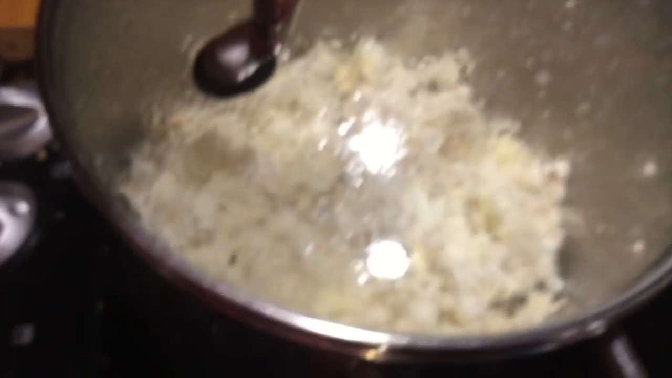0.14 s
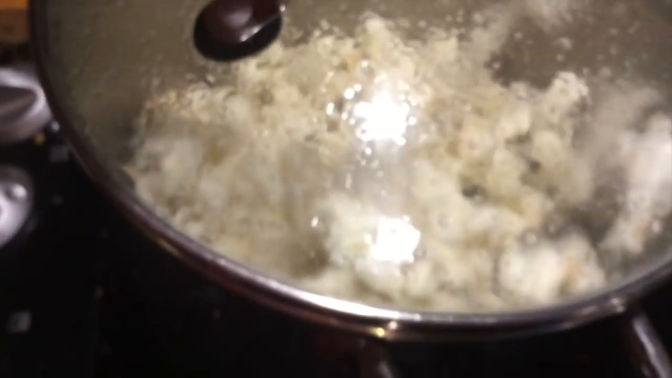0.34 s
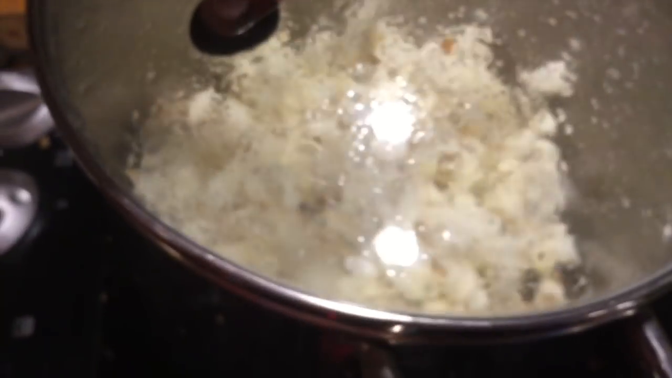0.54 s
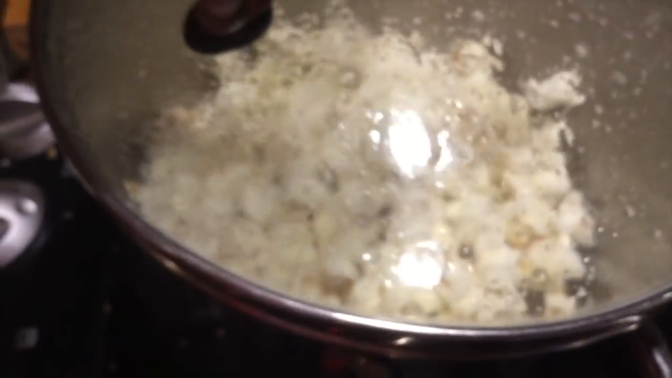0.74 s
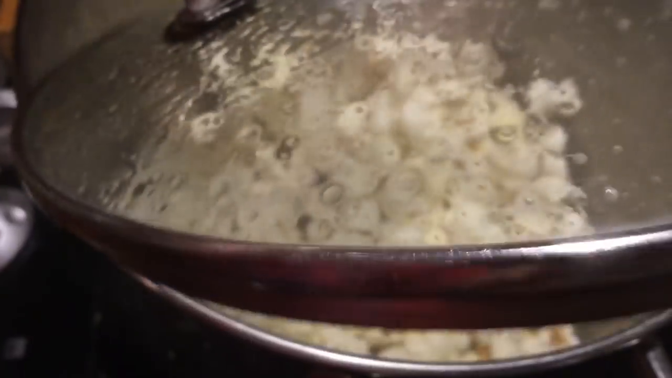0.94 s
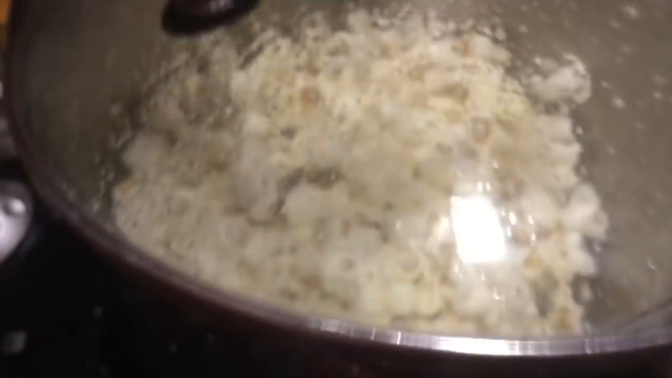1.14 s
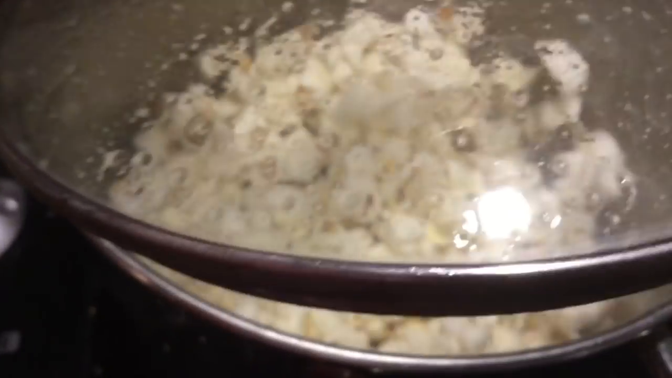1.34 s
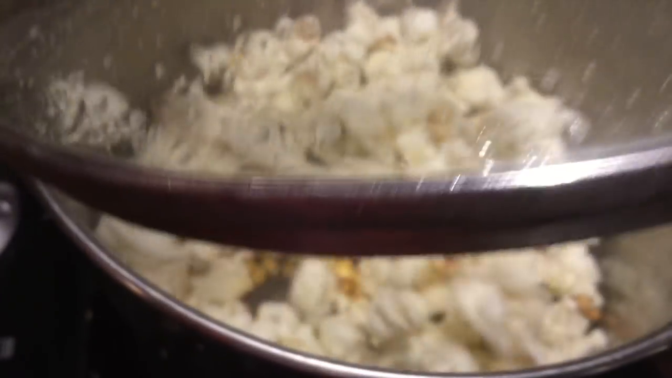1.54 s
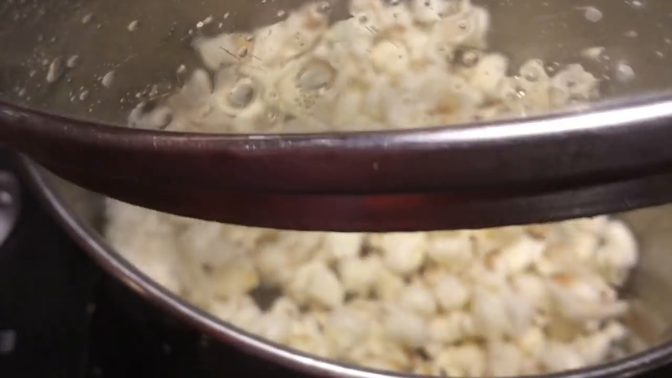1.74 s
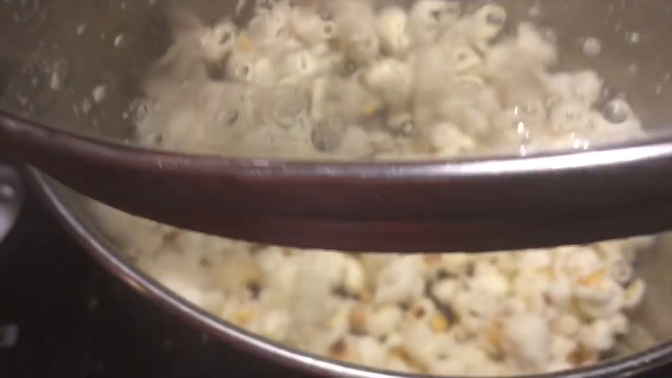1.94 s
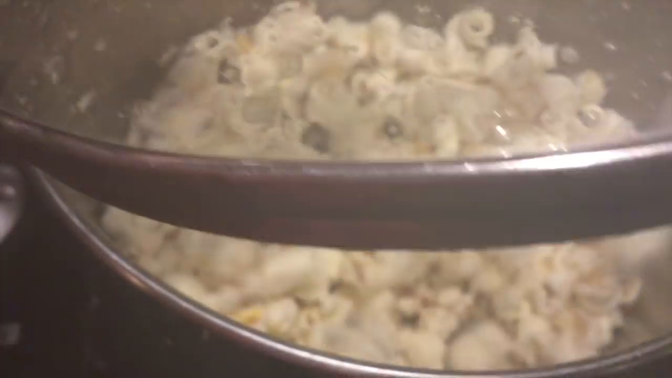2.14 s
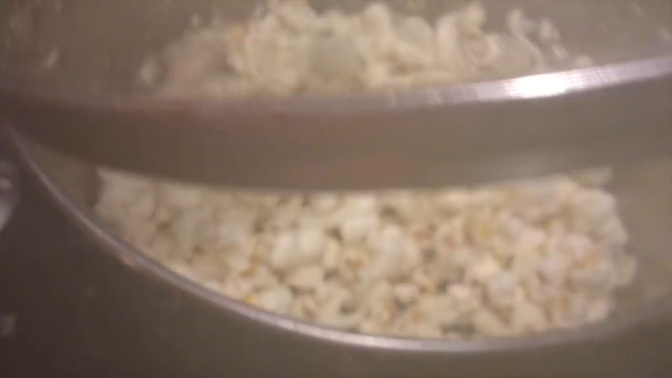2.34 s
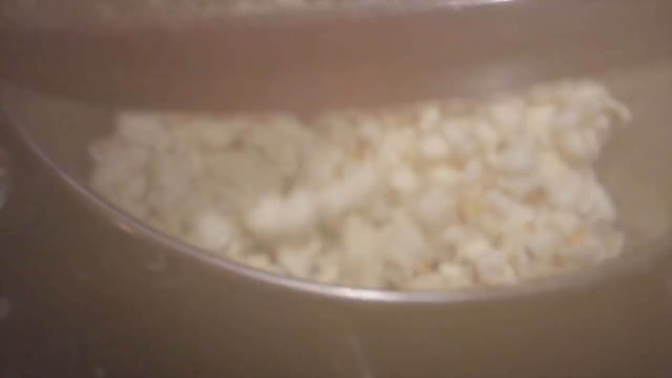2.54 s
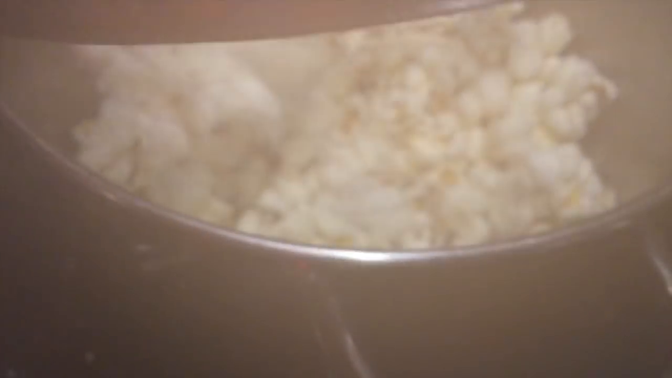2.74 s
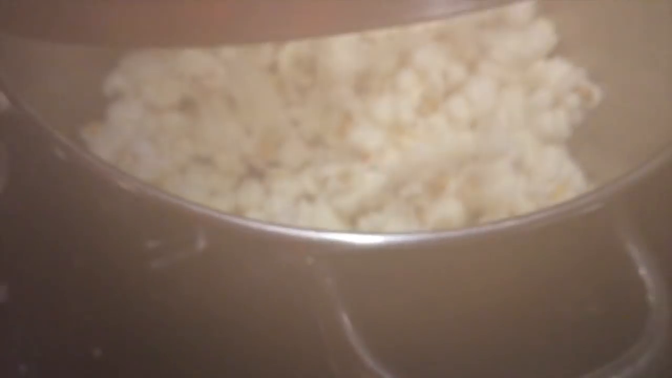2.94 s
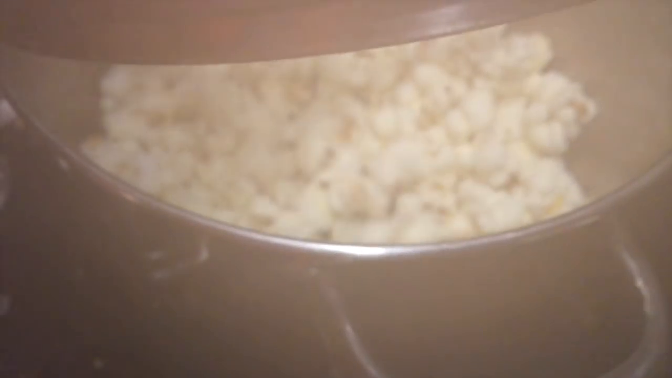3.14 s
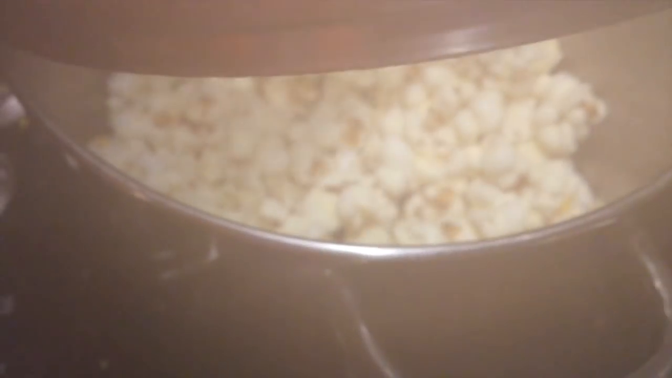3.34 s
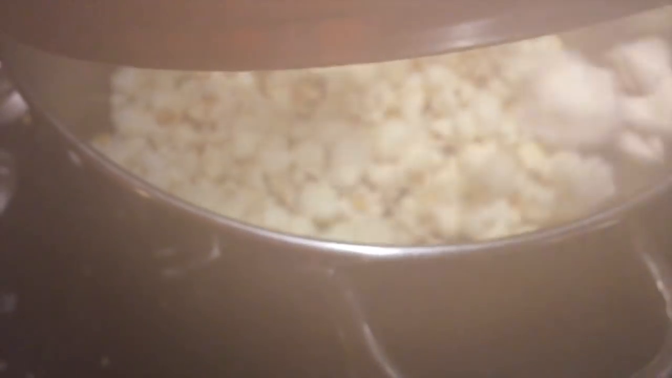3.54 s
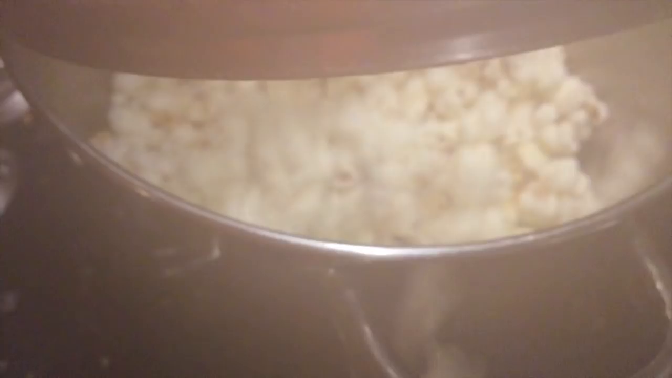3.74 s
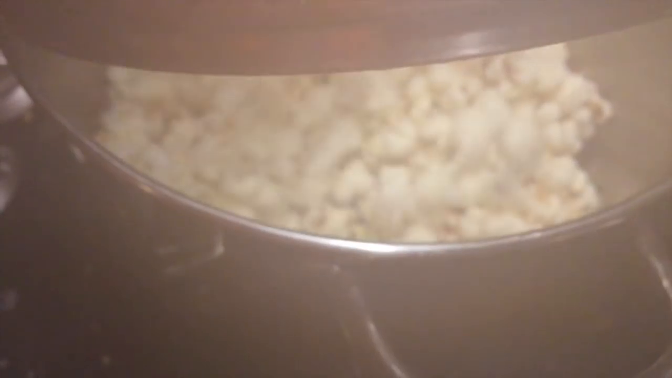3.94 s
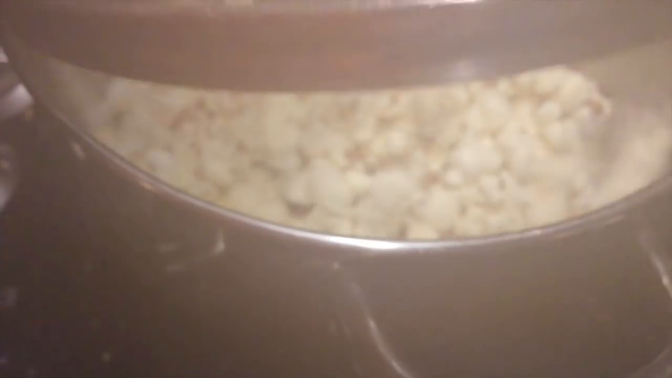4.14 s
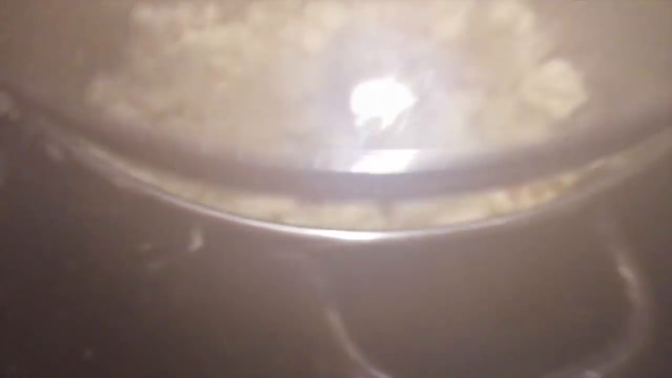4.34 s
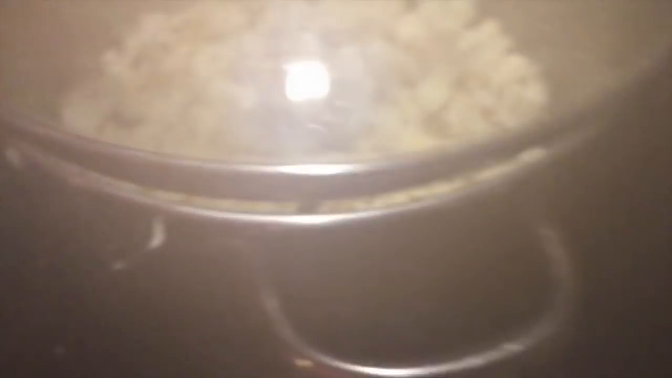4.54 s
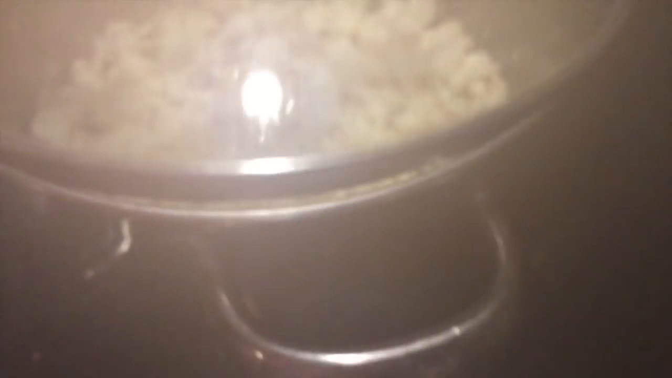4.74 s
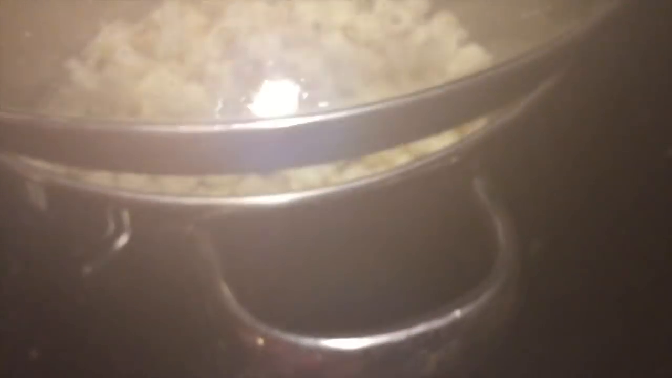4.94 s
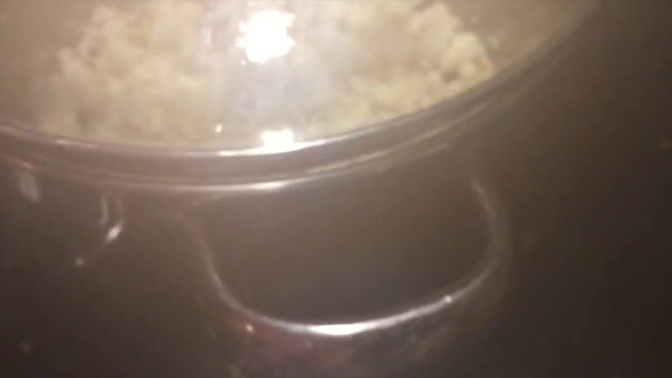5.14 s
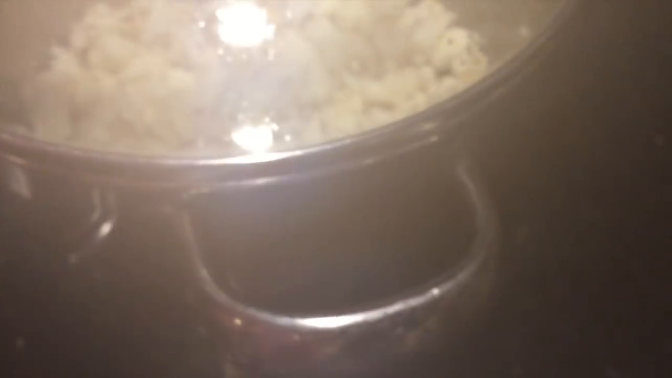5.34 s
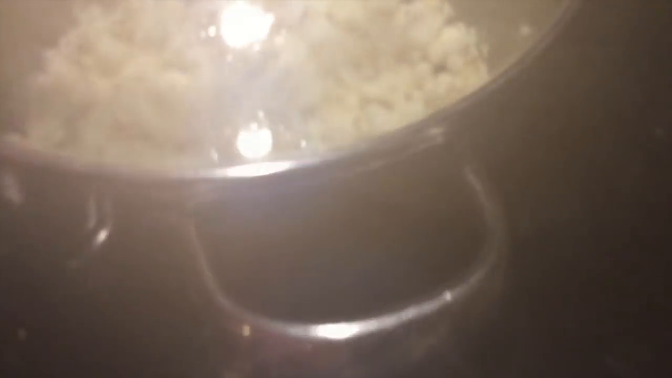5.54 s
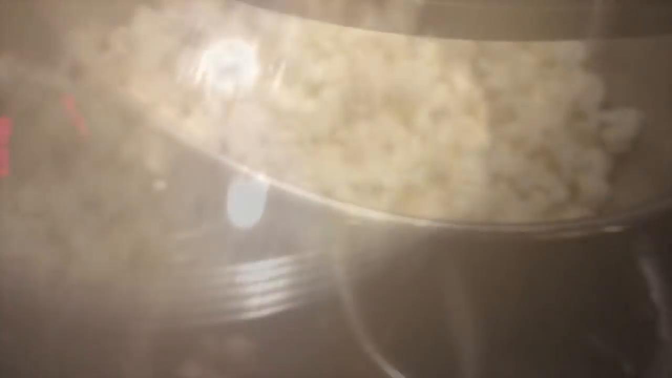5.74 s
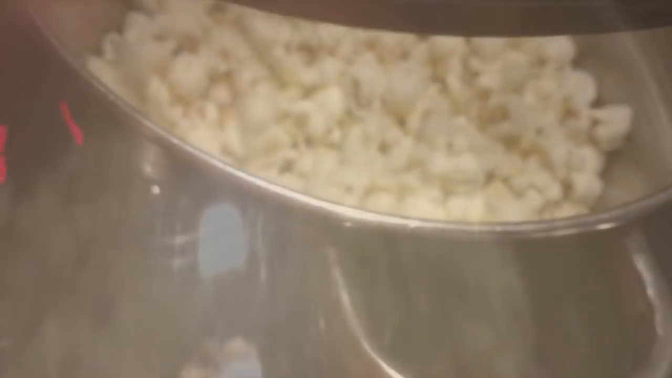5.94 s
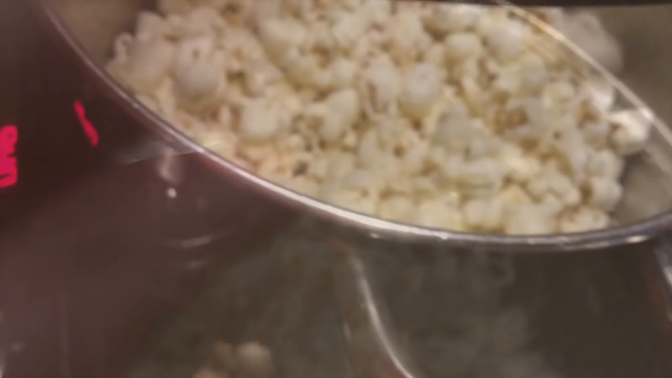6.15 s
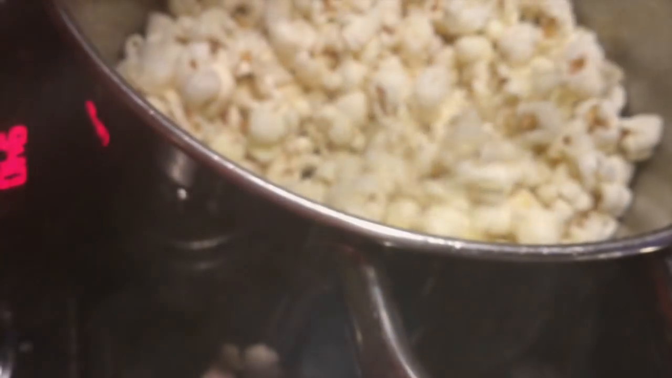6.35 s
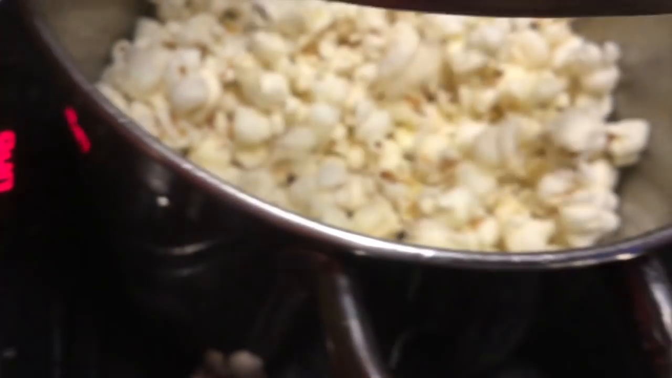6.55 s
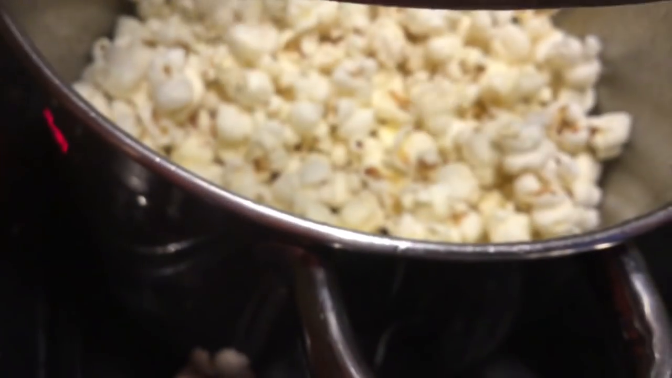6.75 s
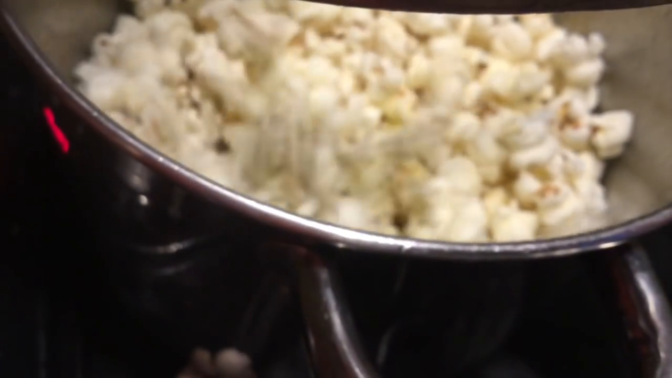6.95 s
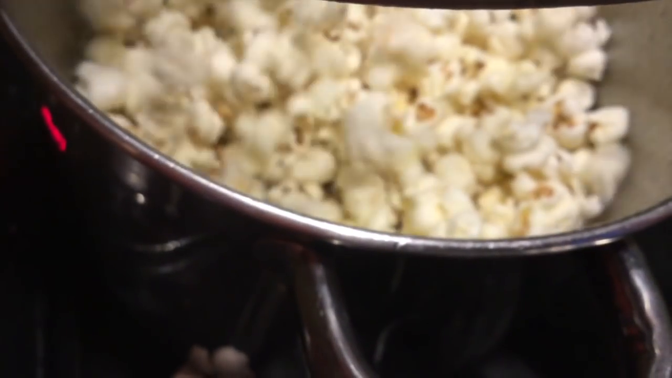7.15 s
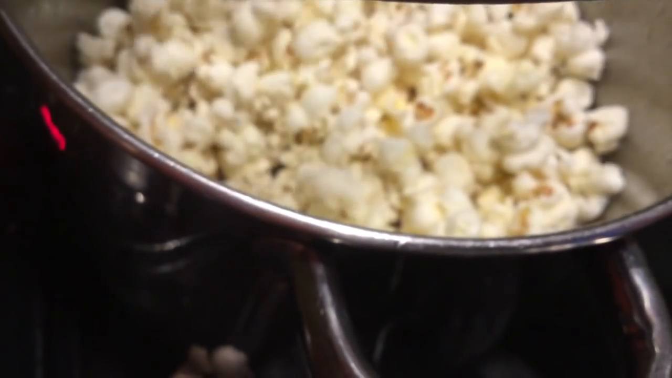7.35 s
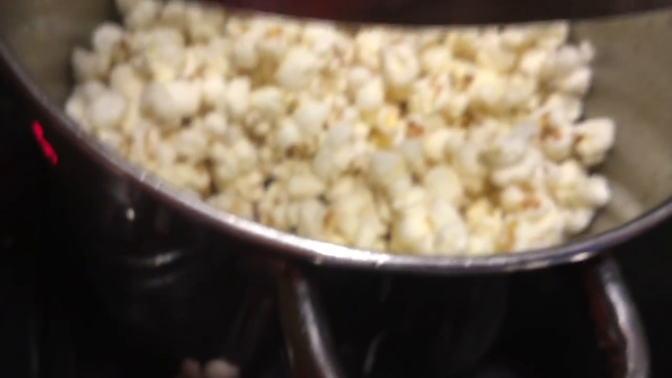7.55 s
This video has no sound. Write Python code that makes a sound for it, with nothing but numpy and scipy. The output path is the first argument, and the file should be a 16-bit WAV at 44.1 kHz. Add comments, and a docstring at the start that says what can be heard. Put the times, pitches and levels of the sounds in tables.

```python
"""Popcorn under a moving glass lid

Popcorn bursts in a steel pot on a hob, close to a phone, while a hand tilts, lifts and lowers the glass lid.
Bursts, landings, sharp lid knocks and small ticks are all made alike: a crack and a puff of noise that kick
the air in the pot and ring its wall. Between these hits oil sizzles in fine grains, the heap shuffles, and
the lid knocks dully and scrapes on the rim. The wider the lid's gap, the higher the air in the pot resounds.
A small kitchen and a soft hiss lie behind."""
import sys
import numpy as np
from scipy import signal
from scipy.fft import rfft, irfft, next_fast_len
from scipy.io import wavfile
from scipy.ndimage import uniform_filter1d, map_coordinates

SR = 44100
rng = np.random.default_rng(int(sys.argv[2]) if len(sys.argv) > 2 else 0)


def store_wav(level_fs):
    """Save 16-bit WAV to argv[1]."""
    pcm = np.round(np.clip(np.atleast_2d(level_fs), -1, 1) * 32767)
    wavfile.write(sys.argv[1], SR, pcm.T.astype(np.int16))


N = 334278

# kitchen and microphone noise floor: (frequency [Hz], density [dB per Hz])
HISS_COLOUR = [(18, -23), (40, 7), (106, -21), (145, -1), (230, -14), (380, 6), (520, -55), (750, -18),
               (1170, -14), (1430, -16), (1670, -15), (2500, -31), (7000, -14.5), (13300, -18),
               (16000, -45)]
# how long the room rings: (frequency [Hz], t60 [s])
KITCHEN_DECAY = [(100, 0.15), (500, 0.12), (1500, 0.16), (4000, 0.084), (12000, 0.076)]
# between hits: (time [s], shuffle on the base [dB], hum of the air [dB], rattle in the wall [dB], sizzle [dB])
BED_LEVELS = [(0.0, -52, -70, -55.5, -62), (0.49, -62, -80, -58.5, -62.5), (0.91, -55.5, -50.5, -55, -58),
              (1.52, -62, -61, -58, -67.5), (1.77, -65, -52, -49, -51), (2.53, -73, -68.5, -60.5, -49.5),
              (2.77, -59, -46, -59, -48), (3.04, -61, -61.5, -56.5, -51.5), (3.25, -79, -92, -64, -58),
              (3.5, -78, -77, -68, -66), (3.93, -63, -52.5, -58.5, -59), (4.28, -67, -57, -49.5, -42),
              (4.54, -64, -62.5, -59.5, -63), (5.07, -58, -48.5, -59.5, -63),
              (5.32, -40.5, -58, -64.5, -73), (5.53, -51.5, -72, -74, -73), (5.79, -58, -73, -57, -55),
              (6.04, -47, -73, -59, -69), (6.23, -63, -81.5, -71.5, -72), (6.93, -76, -89.5, -74.5, -75.5),
              (7.07, -65, -58, -64, -73), (7.58, -78, -78, -57, -47)]
# colour of the spitting oil: (frequency [Hz], density [dB per Hz])
SIZZLE_COLOUR = [(2000, -46), (4500, -13.5), (7000, -6.5), (11500, -5), (13700, -3.5), (15000, -29),
                 (16500, -45)]
# the air rises as the lid opens: (time [s], pitch of the air [Hz], pitch of the lowest wall ring [Hz])
LID_GAP = [(0, 228.5, 1284), (.8, 228.6, 1307), (.9, 254.3, 1290), (.96, 352, 1250), (1.03, 330, 1250),
           (1.15, 351.9, 1252), (4.2, 351.6, 1239), (4.4, 335, 1258), (4.5, 317, 1252), (4.6, 287.9, 1262),
           (5.15, 301, 1276), (5.3, 251.4, 1280), (5.75, 250, 1222), (5.9, 347, 1266), (6.4, 354.7, 1198),
           (7.58, 354.5, 1160)]
# the loaded base on the hob: (centre [Hz], width [Hz], level [dB])
BASE_MODES = [(153, 37, -3.5), (74, 81, -11.5)]
# where the loaded base rocks, higher while the hand leans on the lid: (time [s], pitch [Hz])
BASE_ROCK = [(0, 112), (.65, 115), (.85, 142), (1.1, 118), (4.5, 114.4), (5.3, 157), (6.3, 135),
             (6.9, 99.85), (7.58, 119.4)]
# steel wall and lid: (centre [Hz], width [Hz], level [dB])
WALL_MODES = [(1247, 22.5, -5.5), (1840, 82, -0.5), (2078, 18, -9.5), (2753, 123, -5), (3220, 175, -12.5),
              (3935, 224, 0), (4628, 108, -9), (4856, 32, -1), (5850, 48, -9)]
# the glass lid while it sits on the pot: (centre [Hz], width [Hz], level [dB])
GLASS_MODES = [(1753, 18, -0.5), (2404, 28, 5), (3020, 45, -15), (3620, 17, 0), (5200, 76, -21),
               (5250, 110, -8), (5710, 43, -3)]
# the lid's rim drags on the pot:
# (start [s], length [s], level [dB], first resonance [Hz], last resonance [Hz], width [Hz])
RIM_DRAGS = [(.875, 0.16, -48.5, 556, 835, 90.5), (.89, 0.163, -55.5, 480, 693, 110),
             (1.275, 0.067, -50.5, 807, 800, 250), (1.394, 0.07, -54.5, 740, 685, 250),
             (5.02, 0.064, -54.5, 880, 880, 200), (5.167, 0.11, -54.5, 588, 594, 399.7),
             (5.344, 0.056, -39, 700, 607, 401), (5.479, 0.051, -58.5, 621, 566, 400),
             (5.91, 0.066, -52, 675, 637, 401), (5.97, .1, -55, 670, 645, 397),
             (6.12, .14, -59, 650, 740, 400)]
# dull jolts from the lid and the heap:
# (time [s], level [dB], base over that [dB], air over that [dB], base pitch [Hz], t60 [s])
DULL_KNOCKS = [(0.382, -31.5, 1.5, -1.5, 164, 0.081), (0.745, -44.5, 8, -4, 135, 0.084),
               (0.86, -36, 3, -4, 164, 0.07), (0.884, -18, -2, 0, 235, 0.068),
               (0.954, -39.5, -8, 3, 164, 0.08), (1.199, -30, -3, -0.5, 233, 0.11),
               (1.299, -37.5, -3, 0, 191, 0.13), (1.41, -38, -7, 2, 235, 0.11),
               (1.84, -34, 5, -1, 213, 0.07), (1.906, -31, 8.5, -6, 151.5, 0.034),
               (2.787, -46, 0, -6, 218, 0.062), (3.204, -41.5, -4, -1, 140, 0.07),
               (4.508, -36, 7, -1, 234, 0.07), (4.659, -52, -11, -11, 235, 0.072),
               (4.751, -28.5, 2.5, -0.5, 211, 0.059), (4.913, -39, -6, 1, 232, 0.07),
               (5.035, -41, -12, 2, 161, 0.091), (5.209, -36, 2, -1, 190, 0.074),
               (5.508, -33, 5.5, -3, 132, 0.084), (5.873, -43, 10, -10, 139, 0.07),
               (5.917, -25.5, 7.5, 2, 148, 0.082), (5.988, -36, 5, -3, 156, 0.054),
               (6.031, -47, 0, -4, 143, 0.053), (6.109, -35, 9, -5.5, 145, 0.05),
               (6.205, -46.5, 8, -6, 140, 0.047), (7.032, -38.5, -12.5, 4, 234, 0.078),
               (7.064, -47, -8, 5, 132, 0.077), (7.451, -34, 1, 3, 234, 0.059)]
# bursts, landings, sharp lid knocks and small ticks: (peak time [s], low puff [dB], high puff [dB],
# wall ring [dB], air in the pot [dB], base [dB], the hit's own note [Hz], rise [s], t60 [s],
# fizz it leaves behind [dB])
HITS = [(0.029, -46, -30, -40, -42, -22, 3650, 0.00091, 0.057, -64),
        (0.0639, -39, -24.5, -43, -43, -27, 6220.0, 0.001, 0.054, -70),
        (0.1066, -35.5, -38.5, -42, -46, -24, 3470, 0.0013, 0.052, -85),
        (0.193, -47, -40, -47, -34, -22.5, 1790.0, 0.00078, 0.065, -70),
        (0.2227, -43, -33.5, -51, -47, -37, 5740, 0.0018, 0.073, -68),
        (0.2386, -35.5, -36.5, -35.5, -43, -27, 3440, 0.00169, 0.033, -71),
        (0.3165, -29.5, -16, -38.5, -47, -22, 3780, 0.0026, 0.022, -42),
        (0.3986, -41, -44.5, -40, -30.5, -26, 1780, 0.005, 0.085, -68),
        (0.4365, -33.5, -32, -38, -37.5, -22, 1830, 0.00117, 0.037, -62),
        (0.5897, -40, -40, -40.5, -39, -24, 6040.0, 0.0022, 0.086, -70),
        (0.621, -39.5, -56, -41, -40, -19, 1530, 0.0049, 0.084, -76),
        (0.669, -50, -48, -50, -66, -34, 1540, 0.00079, 0.042, -90),
        (0.7026, -63, -48, -61, -56, -53, 4200, 0.00088, 0.021, -90),
        (0.8144, -47, -47.5, -50, -62, -18.5, 4100, 0.0055, 0.049, -63),
        (1.0897, -23.5, -21.5, -41, -31, -33, 4350, 0.0015, 0.027, -67),
        (1.1613, -25.5, -38, -32.5, -17, -20.5, 1840, 0.00088, 0.041, -59),
        (1.3563, -32, -37, -36, -29, -25.5, 3330, 0.002, 0.031, -81),
        (1.514, -22.5, -23.5, -34.5, -20, -23, 3400.0, 0.0016, 0.026, -73),
        (1.564, -24.5, -24, -42, -24, -41, 3330, 0.0015, 0.032, -70),
        (1.5864, -20, -14.5, -37, -18, -27, 5800, 0.00084, 0.019, -76),
        (1.6762, -26.5, -24.5, -56, -28, -26, 6100, 0.0062, 0.03, -72),
        (1.7394, -24.5, -27, -45, -26, -27, 3830, 0.00046, 0.062, -47),
        (1.804, -42, -40, -57, -41, -40, 2010, 0.00045, 0.11, -70),
        (1.824, -28, -46, -40, -12.5, -20, 1780, 0.0011, 0.033, -33.5),
        (1.8725, -27.5, -22, -42, -34, -17, 3270, 0.00043, 0.03, -70),
        (1.8935, -19, -21, -37, -19.5, -26, 1845, 0.00079, 0.018, -49),
        (1.9543, -38, -47, -43.5, -37, -48, 4100, 0.00094, 0.021, -68),
        (1.995, -26, -34, -37.5, -29.5, -54, 4090, 0.00085, 0.017, -31),
        (2.04, -41, -44, -60, -32.5, -56, 4070, 0.0037, 0.07, -38),
        (2.113, -42, -41, -51, -43, -55, 4080, 0.0053, 0.034, -67),
        (2.138, -48, -38.5, -60, -51, -54, 3980.0, 0.00065, 0.054, -70),
        (2.157, -50, -39, -71, -59, -42, 3950.0, 0.00059, 0.065, -70),
        (2.172, -22.5, -20.5, -39.5, -14, -16, 1880, 0.0018, 0.024, -73),
        (2.3232, -42.5, -42, -54, -35, -45, 3760, 0.001, 0.053, -43),
        (2.405, -62, -43, -76, -63, -53, 5770, 0.001, 0.025, -75),
        (2.448, -60, -41, -73, -64, -55, 5280, 0.001, 0.025, -75),
        (2.4773, -56, -39.5, -69, -56, -54, 5770, 0.001, 0.033, -75),
        (2.5042, -43, -39, -71, -57, -61, 3900, 0.0007, 0.03, -67),
        (2.5212, -49.5, -51, -70, -43, -59, 3200, 0.0075, 0.14, -43),
        (2.558, -49.5, -48, -52, -44, -50, 2530, 0.001, 0.025, -75),
        (2.586, -37, -52, -48, -30.5, -42, 1870.0, 0.00071, 0.11, -70),
        (2.6027, -24.5, -23.5, -55, -25.5, -40, 3240.0, 0.00059, 0.038, -70),
        (2.6306, -28, -42, -45, -32, -38, 3240, 0.0013, 0.022, -70),
        (2.6489, -34, -29, -59, -46, -47, 3930, 0.00066, 0.022, -70),
        (2.6665, -22.5, -34, -32, -22, -29, 3990, 0.0017, 0.034, -70),
        (2.6834, -36, -39, -56, -36, -30, 2260.0, 0.007, 0.026, -70),
        (2.7129, -28, -29, -39, -13, -15, 5150.0, 0.00221, 0.034, -70),
        (2.7232, -31, -21, -52, -37, -35, 1840, 0.00066, 0.0088, -66),
        (2.744, -49, -38, -58, -52, -44, 5250, 0.001, 0.025, -75),
        (2.7703, -42, -31.5, -50, -45, -39, 4020.0, 0.00065, 0.015, -73),
        (2.7906, -43.5, -41, -55, -46, -43, 3970, 0.001, 0.022, -75),
        (2.832, -27, -29, -41, -12.5, -24, 4390, 0.0045, 0.035, -45),
        (2.873, -38, -31, -55, -34, -37, 4450, 0.00092, 0.025, -75),
        (2.8803, -24.5, -22, -54, -24, -37, 4330, 0.0013, 0.017, -35),
        (2.926, -52, -47, -65, -53, -48, 5660, 0.001, 0.025, -75),
        (2.951, -33, -37, -47, -35, -49, 1870, 0.0011, 0.02, -63),
        (3.0021, -45.5, -48, -66, -38, -41, 4580.0, 0.00071, 0.034, -82),
        (3.0565, -41, -53, -55, -40, -48, 4540, 0.00055, 0.035, -70),
        (3.0736, -25, -20.5, -41.5, -27, -38, 4530.0, 0.001, 0.026, -70),
        (3.0827, -33, -37, -45, -29.5, -45, 2600, 0.00086, 0.019, -70),
        (3.1241, -22.5, -31, -35, -20, -29, 1950.0, 0.0033, 0.024, -37),
        (3.196, -38, -39, -51, -27, -35, 5720, 0.0067, 0.024, -72),
        (3.2827, -42, -33.5, -69, -47, -60, 3180.0, 0.002, 0.027, -61),
        (3.3, -50, -44, -65, -53, -52, 5560, 0.00088, 0.021, -75),
        (3.4453, -40.5, -26, -57, -63, -58, 3300, 0.0017, 0.011, -59),
        (3.491, -22.5, -16, -30, -20.5, -16.5, 5590, 0.0016, 0.032, -70),
        (3.517, -41, -37, -47, -31, -33, 2500, 0.0011, 0.016, -46),
        (3.624, -32.5, -46, -46, -31, -46, 2130, 0.00096, 0.026, -70),
        (3.634, -28, -26.5, -39, -29.5, -44, 4490, 0.0012, 0.019, -70),
        (3.7394, -40, -27.5, -57, -37, -50, 4400, 0.0015, 0.015, -69),
        (3.7662, -29.5, -28, -38.5, -27, -43, 5000, 0.0018, 0.02, -69),
        (3.7754, -26, -33, -42, -25, -32, 3930.0, 0.00084, 0.022, -70),
        (3.8068, -25.5, -28, -42, -20.5, -21, 4530.0, 0.00094, 0.034, -47),
        (3.906, -20.5, -15, -33.5, -10.5, -21, 3270.0, 0.00097, 0.026, -71),
        (4.003, -37, -60, -41, -29.5, -46, 3340, 0.0017, 0.095, -71),
        (4.0133, -22, -24.5, -36, -29, -47, 5780, 0.00093, 0.021, -69),
        (4.0556, -17.5, -19, -27.5, -23, -18, 3820.0, 0.0013, 0.02, -70.5),
        (4.0715, -26, -33, -30, -34, -27, 2680, 0.0019, 0.014, -70),
        (4.0806, -39, -35, -42, -28.5, -40, 1680.0, 0.00077, 0.031, -70),
        (4.116, -46, -39, -48, -50, -41, 4040, 0.00767, 0.05, -32),
        (4.1648, -27, -23, -33, -17, -17, 4580, 0.0026, 0.044, -30.5),
        (4.2103, -34.5, -33, -54, -35, -40, 5800, 0.001, 0.033, -62),
        (4.291, -57, -51, -46, -58, -50, 6400.0, 0.0028, 0.083, -70),
        (4.3204, -40.5, -48, -49, -48, -51, 2500, 0.00083, 0.13, -70),
        (4.343, -23, -19.5, -27.5, -27, -40, 3300, 0.00062, 0.036, -70),
        (4.3804, -25, -22, -30, -17, -19, 3200, 0.00097, 0.033, -55),
        (4.422, -42.5, -37, -56, -47, -42, 3320, 0.001, 0.027, -75),
        (4.434, -26, -26, -36.5, -16.5, -21, 4170, 0.0016, 0.028, -70),
        (4.4662, -24.5, -34.5, -28.5, -18, -17, 5310, 0.0054, 0.043, -70),
        (4.4938, -28.5, -33.5, -54, -29, -23, 3430, 0.0025, 0.02, -57),
        (4.675, -45, -37.5, -50.5, -59, -54, 5750, 0.0013, 0.036, -59),
        (4.77, -35.5, -47, -40.5, -25, -22, 2650, 0.00035, 0.092, -70),
        (4.8081, -34.5, -64, -36, -34, -30, 2670, 0.0035, 0.016, -66),
        (4.8579, -27, -26.5, -34.5, -28.5, -53, 3290, 0.0014, 0.03, -56),
        (4.954, -51, -64, -51.5, -49, -50, 2460, 0.0011, 0.028, -82),
        (5.061, -47, -58, -56, -36, -48, 3140.0, 0.00055, 0.041, -77),
        (5.095, -31, -42.5, -36.5, -20.5, -16, 3100, 0.00078, 0.061, -72),
        (5.132, -48, -47, -45, -46, -40, 2590.0, 0.0014, 0.044, -84),
        (5.1885, -47, -49.5, -52, -27, -21.5, 6270, 0.0016, 0.083, -78),
        (5.267, -45, -52, -60, -49, -31, 6060.0, 0.00091, 0.029, -62),
        (5.3254, -37, -51, -42.5, -31, -12, 2770.0, 0.00091, 0.11, -70),
        (5.359, -32, -43.5, -40.5, -18, -9, 2320, 0.0044, 0.059, -78),
        (5.4955, -53, -55.5, -55, -42, -32, 1910.0, 0.0016, 0.09, -87),
        (5.5736, -39, -34, -51, -59, -26.5, 1770, 0.00092, 0.068, -56),
        (5.6987, -44.5, -52, -53, -52, -36, 2570, 0.00234, 0.059, -48.5),
        (5.9076, -37, -46.5, -53, -44, -27, 4080, 0.0043, 0.15, -74),
        (5.9817, -54, -52, -67, -42, -36, 2380, 0.00221, 0.041, -82),
        (6.078, -51.5, -58, -55, -62, -31, 1980, 0.0046, 0.06, -67),
        (6.175, -42, -51, -45.5, -52, -28.5, 1660, 0.0014, 0.093, -57),
        (6.3388, -56.5, -61, -59, -63, -45, 2690.0, 0.0019, 0.039, -70),
        (6.375, -58, -52, -67, -65, -41, 5420.0, 0.0046, 0.038, -70),
        (6.4343, -29, -32.5, -41.5, -22.5, -23.5, 2730, 0.00058, 0.029, -54.5),
        (6.4705, -50, -58, -57, -47, -43, 1800, 0.00091, 0.023, -75),
        (6.5138, -36.5, -48, -47, -33, -45, 2650, 0.00029, 0.029, -68.5),
        (6.6473, -51, -63, -55.5, -42, -51, 2670.0, 0.0017, 0.023, -82),
        (6.916, -54, -64, -72.5, -50.5, -41, 2700.0, 0.0013, 0.031, -70),
        (6.9364, -39, -40.5, -43, -25.5, -29, 3500, 0.0028, 0.027, -47.5),
        (6.9804, -15.5, -17, -38, -4, -16, 1824, 0.0019, 0.023, -70),
        (6.995, -32, -38, -36, -42, -29, 2830.0, 0.0042, 0.019, -69),
        (7.1544, -26, -26, -42, -24.5, -28, 2760, 0.005, 0.021, -51),
        (7.2647, -48.5, -55, -54, -50, -51, 1630, 0.0063, 0.036, -66),
        (7.2887, -62, -46, -71, -62, -57, 3060, 0.001, 0.025, -75),
        (7.3197, -43.5, -41, -50.5, -43, -55, 6440, 0.0044, 0.037, -80),
        (7.4002, -51, -48.5, -57, -39, -55, 6330.0, 0.0036, 0.22, -70),
        (7.434, -31.5, -28.5, -38.5, -22.5, -39, 1660, 0.0065, 0.048, -26.5),
        (7.479, -39.5, -45, -45, -39, -37, 3600, 0.00073, 0.018, -75),
        (7.4885, -48, -49, -59, -46, -46, 6340, 0.00065, 0.037, -64),
        (7.517, -44, -44, -60, -43, -43, 1700, 0.001, 0.028, -75),
        (7.5416, -42, -36.5, -47, -42, -57, 5150, 0.0012, 0.09, -70),
        (7.5574, -52, -44, -55, -45, -47, 6370, 0.0011, 0.022, -75)]
# colour of the puff's body before the wall colours it: (frequency [Hz], density [dB per Hz])
BODY_COLOUR = [(300, -4), (600, -2), (1500, -2.5), (2500, 4.5), (5500, -5), (7500, -7.5), (12000, -16)]
# colour of the puff's bright top: (frequency [Hz], density [dB per Hz])
TOP_COLOUR = [(3000, -48), (5000, -7), (7000, -6.5), (11000, -4.5), (13500, -4.5), (15000, -23),
              (16500, -71)]

HISS_DB, KITCHEN_DB = -67, -15.5
DRAG_ATTACK, DRAG_FADE_DB = 0.16, 9  # share of the length spent rising; loss over one length
DRAG_GLIDE = 4.05  # e-folds per length of the slide towards the last pitch
FIZZ_RISE_S, FIZZ_T60_S = 0.028, 0.2  # oil and steam flare after a hit (time constant) and settle
SPIT_DB = -2  # single loud drops, before the oil's colour
AIR_T60_S, BASE_T60_S = 0.043, 0.034  # after a hit
BASE_SCATTER = 0.072  # typical share by which the base's pitch varies
TOP_HZ = 16645  # the microphone's band limit


def amp(db):
    """dB to gain."""
    return 10 ** (np.asarray(db) / 20)


def unit(x):
    """Scaled to rms 1."""
    return x / np.sqrt(np.mean(x ** 2) + 1e-20)


def along(points, hz):
    """(Hz, value) points read on a log frequency axis."""
    f, v = np.transpose(points)
    return np.interp(np.log(hz + 1), np.log(f + 1), v)


def curves(rows):
    """One value per sample for each column after the time."""
    s, *columns = np.transpose(rows)
    return [np.interp(np.arange(N) / SR, s, column) for column in columns]


def wobble(rate):
    """A smooth random curve, rate knots a second."""
    knots = rng.standard_normal(int(N * rate / SR) + 4)
    return map_coordinates(knots, [np.arange(N) * rate / SR])


def filtered(x, response):
    """x through a complex response of frequency."""
    m = next_fast_len(len(x) + 8192)
    return irfft(rfft(x, m) * response(np.fft.rfftfreq(m, 1 / SR)), m)[:len(x)]


def modes(table):
    """Causal response of parallel resonances, their signs alternating."""
    def response(f):
        return sum((-1) ** k * amp(db) * 1j * f * width / (hz * hz - f * f + 1j * f * width)
                   for k, (hz, width, db) in enumerate(table))
    return response


def spectrum(points):
    """Zero-phase response through (Hz, dB) points."""
    return lambda f: amp(along(points, f))


def noise(response, lumps_db=0, rate=100):
    """Coloured noise of rms 1, lumpy at the given rate in knots a second."""
    return unit(filtered(rng.standard_normal(N) * amp(lumps_db * wobble(rate)), response))


def narrow(hz, width_hz):
    """Noise of rms 1 in one steep resonance whose pitch moves: slow noise shifted up to hz."""
    pole = np.exp(-np.pi * width_hz / SR)
    white = rng.standard_normal(N) + 1j * rng.standard_normal(N)
    slow = signal.lfilter([1], np.convolve([1, -pole], [1, -pole]), white)
    return unit((slow * np.exp(2j * np.pi * np.cumsum(hz) / SR)).real)


def spits(rate, spread_db, life):
    """Random noise ticks of unequal size, rms 1: rate a second, each decaying with time constant life in s."""
    sizes = amp(spread_db * np.minimum(rng.exponential(size=N), 3))
    starts = (rng.random(N) < rate / SR) * sizes
    envelope = signal.lfilter([1], [1, -np.exp(-1 / (life * SR))], starts)
    return unit(envelope * rng.standard_normal(N))


def patchy(x, depth_db, bins, frames):
    """x with random patches of gain over time and frequency."""
    z = signal.stft(x, nperseg=256)[2]
    field = uniform_filter1d(rng.standard_normal(z.shape), bins, 0)
    field = uniform_filter1d(field, frames, 1)
    return signal.istft(z * amp(depth_db * unit(field)), nperseg=256)[1][:N]


def shut():
    """1 while the lid sits low and the air is deep, 0 when it is open."""
    air_hz, _ = curves(LID_GAP)
    return np.clip((335 - air_hz) / 60, 0, 1)


def hiss():
    """Steady noise floor of kitchen and microphone."""
    return amp(HISS_DB) * noise(spectrum(HISS_COLOUR))


def kitchen(x):
    """Room reverb: each frequency of the noise tail dies at its own speed."""
    hz, t, z = signal.stft(rng.standard_normal(SR // 2), SR, nperseg=256)
    decay = amp(-60 * t / along(KITCHEN_DECAY, hz)[:, None])
    tail = signal.istft(z * decay, SR, nperseg=256)[1]
    late = np.pad(x, (400, 0))  # the room answers 9 ms after the source
    return signal.fftconvolve(late, tail / np.linalg.norm(tail))[:N]


def flare():
    """Level of the fizz that the hits leave behind, each rising quickly and settling slowly."""
    kicks, t = np.zeros(N), np.arange(SR) / SR
    for row in HITS:
        kicks[round(row[0] * SR)] = amp(row[-1])
    swell = (1 - np.exp(-t / FIZZ_RISE_S)) * amp(-60 * t / FIZZ_T60_S)
    return signal.fftconvolve(kicks, swell)[:N]


def sizzle():
    """Oil spits in fine grains, with single louder drops among them; rms 1."""
    fizz = .6 * rng.standard_normal(N) + spits(650, spread_db=3.5, life=.0006)
    fizz += amp(SPIT_DB) * spits(70, spread_db=2, life=.0018)
    return unit(filtered(patchy(fizz, depth_db=2.1, bins=5, frames=8), spectrum(SIZZLE_COLOUR)))


def rattle():
    """The shifting heap taps the wall, stirs its lowest ring and shakes the glass while the lid is low."""
    _, wall_hz = curves(LID_GAP)
    wall = modes(WALL_MODES)
    taps = .6 * rng.standard_normal(N) + spits(300, spread_db=3.5, life=.002)
    taps = patchy(taps, depth_db=0.8, bins=4, frames=10)
    steel = unit(filtered(taps, lambda f: amp(along(BODY_COLOUR, f)) * (0.22 + wall(f)) * (0.44 + wall(f))))
    glass = .4 * shut() * noise(modes(GLASS_MODES), lumps_db=4.5, rate=60)
    return steel + 0.21 * narrow(wall_hz, width_hz=49) + glass


def bed():
    """Oil and heap between hits: sizzle, rattle, base and humming air; hits stir up both fizz and rattle."""
    base_db, air_db, wall_db, sizzle_db = curves(BED_LEVELS)
    air_hz, _ = curves(LID_GAP)
    stir = amp(1.05 * wobble(39)) * (1 + flare() / amp(sizzle_db))
    grains = stir * (amp(sizzle_db) * sizzle() + amp(wall_db) * rattle())
    shuffle = amp(base_db) * noise(modes(BASE_MODES), lumps_db=4.0, rate=17)
    hum_db = air_db + 1.6 * wobble(30) + 3.05 * wobble(7.6)
    return grains + shuffle + amp(hum_db) * narrow(air_hz, width_hz=85)


def lid():
    """The rim's scrape is noise in one sliding resonance; it rises, fades and stops."""
    out, t = np.zeros(N), np.arange(N) / SR
    for s, length, db, first_hz, last_hz, width_hz in RIM_DRAGS:
        u = (t - s) / length
        fade = amp(-DRAG_FADE_DB * np.clip(u, 0, 2))
        stop = np.clip((1.2 - u) / 0.21, 0, 1)  # dies out just past the nominal length
        shape = np.clip(u / DRAG_ATTACK, 0, 1) * fade * stop
        slips_db = 3 * wobble(60)  # the rim catches and slips
        hz = last_hz + (first_hz - last_hz) * np.exp(-DRAG_GLIDE * np.clip(u, 0, 2))
        out += shape * amp(db + slips_db) * narrow(hz, width_hz=width_hz)
    return out


def thumps():
    """A jolt pushes air through the lid's gap: a strong swing, a faint wavering tail, and the base rocks."""
    t = np.arange(SR // 6) / SR
    out, tail = np.zeros((2, N + len(t)))
    air_hz, _ = curves(LID_GAP)
    rock_hz, = curves(BASE_ROCK)
    # hits push from just before their peak
    jolts = [(s - 1.145 * rise, base_db, air_db, rock_hz[round(s * SR)], BASE_T60_S, AIR_T60_S)
             for s, _, _, _, air_db, base_db, _, rise, _, _ in HITS]
    jolts += [(s, db + base_db, db + air_db, hz, t60, t60) for s, db, base_db, air_db, hz, t60 in DULL_KNOCKS]
    scatter = rng.standard_normal((len(jolts), 2))
    for (s, base_db, air_db, base_hz, base_t60, air_t60), (air_off, base_off) in zip(jolts, scatter):
        i = round(s * SR)
        at = slice(i, i + len(t))
        phase = 2 * np.pi * air_hz[i] * (1 + 0.023 * air_off) * t
        start = amp(air_db) * (1 - np.exp(-t / 0.0017))
        swing = amp(-60 * t / air_t60) * np.sin(phase)
        swing += 0.47 * amp(-60 * t / 0.026) * np.sin(0.74 * phase)  # a shorter, deeper partner
        out[at] += start * swing
        tail[at] += start * 0.045 * amp(-60 * t / 0.16)
        rock = np.sin(2 * np.pi * base_hz * (1 + BASE_SCATTER * base_off) * t)
        # the base starts in the opposite direction to the air
        out[at] -= amp(base_db - 60 * t / base_t60) * (1 - np.exp(-t / 0.0042)) * rock
    return out[:N] + tail[:N] * amp(6.7 * wobble(45)) * narrow(air_hz, width_hz=140)


def puff_noise():
    """Body and bright top of the puffs, rms 1 each: a spray of sharp ticks on noise, the body ringing the wall."""
    wall = modes(WALL_MODES)
    spray = .8 * rng.standard_normal(N) + spits(750, spread_db=3, life=.00035)
    body = filtered(spray, lambda f: amp(along(BODY_COLOUR, f)) * (0.3 + wall(f)))
    top = filtered(spray, spectrum(TOP_COLOUR))
    # random patches over time and frequency make the puffs' colour uneven
    body = patchy(body, depth_db=3, bins=3, frames=4)
    top = patchy(top, depth_db=3, bins=4, frames=3)
    return unit(body), unit(top)


def hits():
    """Each hit starts abruptly, cracks and lets out a puff of noise; it rings the wall and a note of its own."""
    lead = SR // 50  # room for the swell ahead of the peak
    t = (np.arange(SR // 7) - lead) / SR
    after = np.maximum(t, 0)
    low, high, ring = np.zeros((3, N + len(t)))
    _, wall_hz = curves(LID_GAP)
    seated = shut()  # the wall rings longer under the lid
    for row, chance in zip(HITS, rng.standard_normal((len(HITS), 7))):
        s, low_db, high_db, ring_db, _, _, note_hz, rise, t60, _ = row
        note_phase, pair_off, pair_phase, *mode_off, mode_pitch_off = chance
        i = round(s * SR)
        at = slice(i, i + len(t))
        # the swell starts abruptly and grows up to the peak
        onset = np.clip((t + 1.25 * rise + 0.0027) / 0.00033, 0, 1)
        swell = np.exp(1.16 * np.minimum(t, 0) / rise) * onset
        puff = swell * (amp(-60 * after / t60) + 0.048 * amp(-60 * after / 0.21))
        # two clicks: one at the peak, one in the swell before it
        crack = 0.2 * np.exp(-np.abs(t) / 0.000053) + 0.2 * np.exp(-np.abs(t + 1.4 * rise) / 0.000067)
        low[at] += amp(low_db) * (puff + crack)
        high[at] += amp(high_db) * (puff + crack)
        note = np.sin(2 * np.pi * note_hz * t + note_phase)
        ring[at] += amp(low_db - 4 - 60 * after / 0.035) * swell * note
        # the round wall's lowest mode is a close pair that beats
        pair = sum(np.sin(2 * np.pi * wall_hz[i] * (1 + 0.034 * side + 0.013 * pair_off) * t
                          + side * pair_phase) for side in (-1, 1))
        ring[at] += amp(ring_db - 60 * after / (0.058 + 0.034 * seated[i])) * swell * pair
        for (hz, width_hz, level_db), level_off in zip(WALL_MODES[1:4], mode_off):
            gain = amp(low_db + level_db - 16.0 + 2 * level_off)
            tone = np.sin(2 * np.pi * hz * (1 + 0.0047 * mode_pitch_off) * t)
            ring[at] += gain * swell * np.exp(-np.pi * width_hz * after) * tone
    body, top = puff_noise()
    heard = slice(lead, lead + N)
    puffs = low[heard] * body
    glass = amp(7) * filtered(seated * puffs, modes(GLASS_MODES))
    return puffs + glass + high[heard] * top + ring[heard]


def scene():
    """Noise floor, room, bed, lid and hits in one channel."""
    pot = thumps() + hits()
    room = amp(KITCHEN_DB) * kitchen(pot)
    return (hiss() + room + bed() + lid() + pot)[None]


def record(dry):
    """The phone's microphone drops deep bass, rounds off the hardest peaks and stops at its band limit."""
    x = filtered(dry[0], lambda hz: (1j * hz / (33 + 1j * hz)) ** 3)
    x = x / (1 + np.abs(x / .58) ** 4) ** (1 / 4)
    return filtered(x, lambda hz: hz < TOP_HZ)[None]


dry = scene()
out = record(dry)
store_wav(out)
```